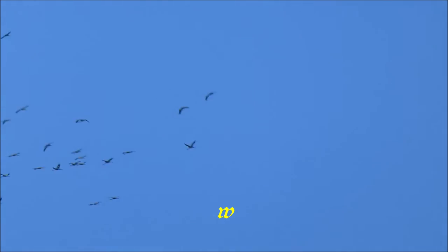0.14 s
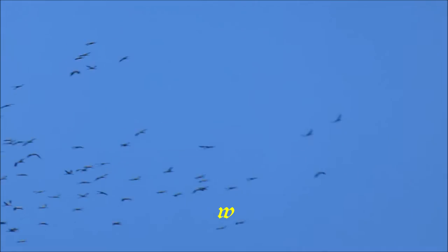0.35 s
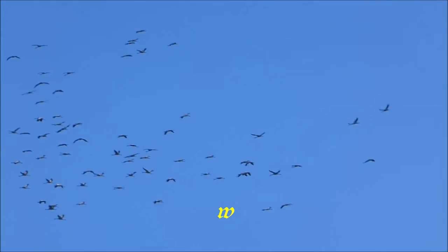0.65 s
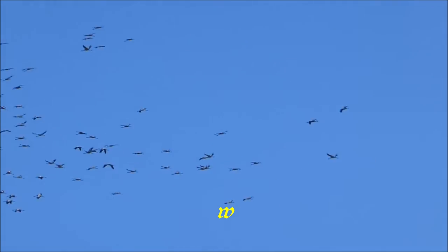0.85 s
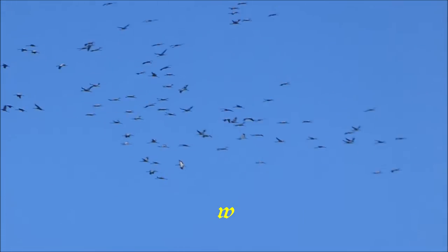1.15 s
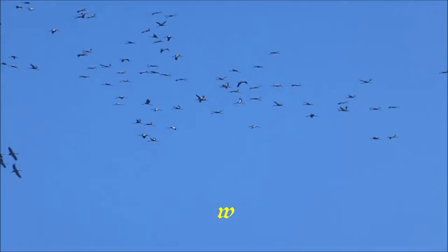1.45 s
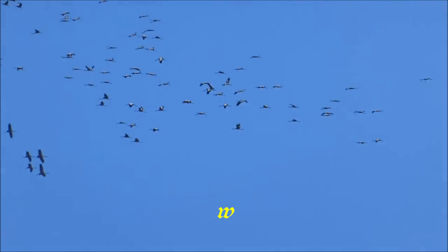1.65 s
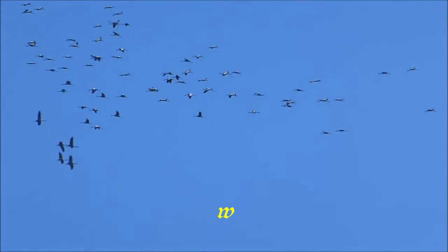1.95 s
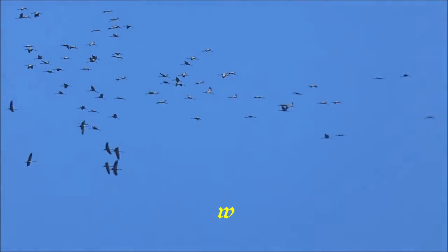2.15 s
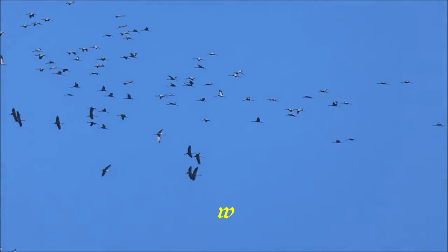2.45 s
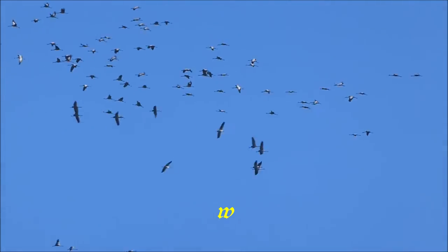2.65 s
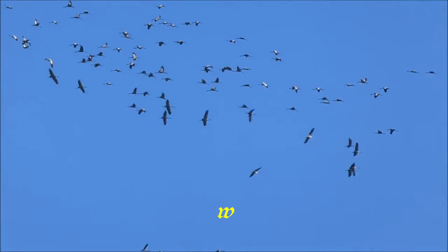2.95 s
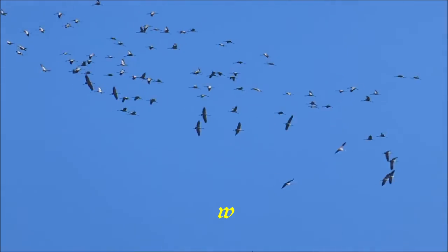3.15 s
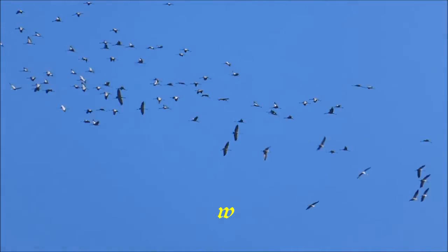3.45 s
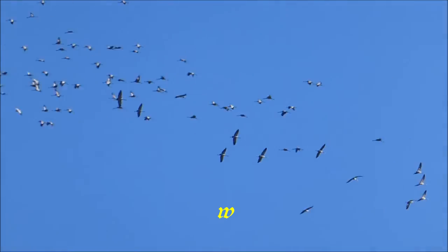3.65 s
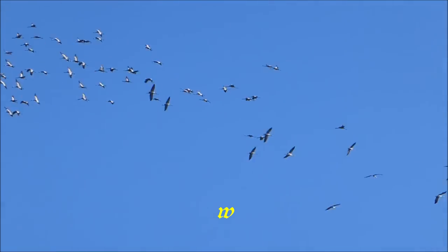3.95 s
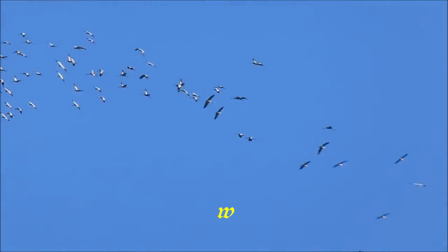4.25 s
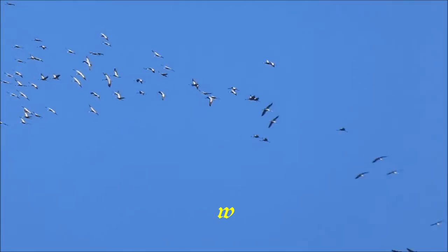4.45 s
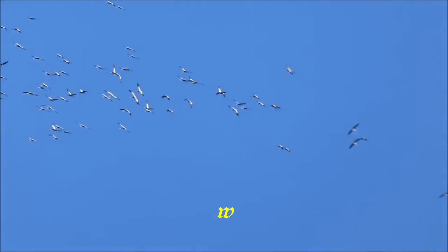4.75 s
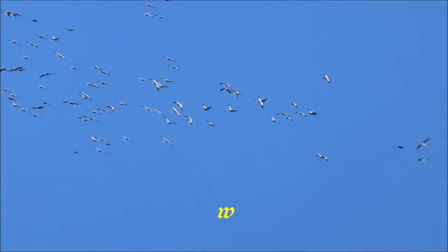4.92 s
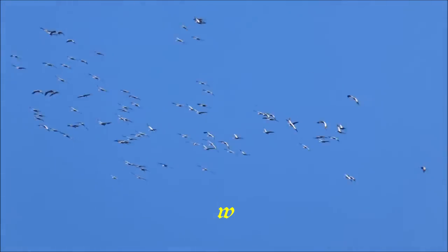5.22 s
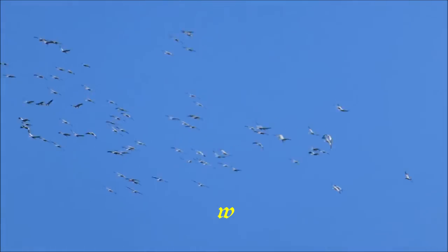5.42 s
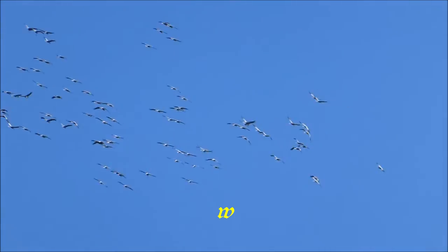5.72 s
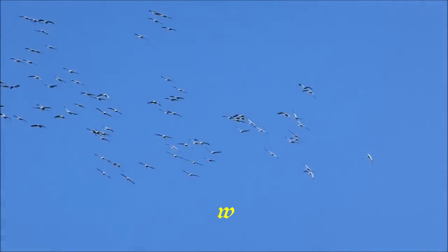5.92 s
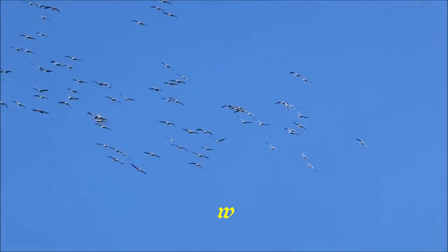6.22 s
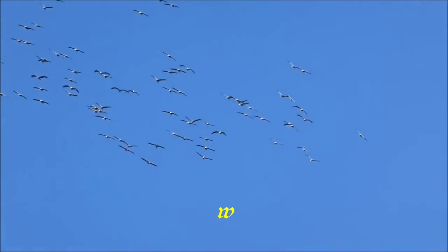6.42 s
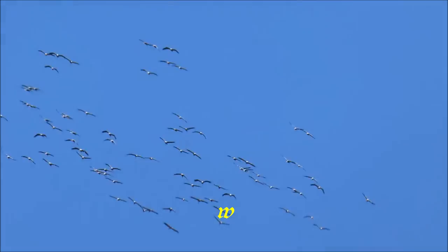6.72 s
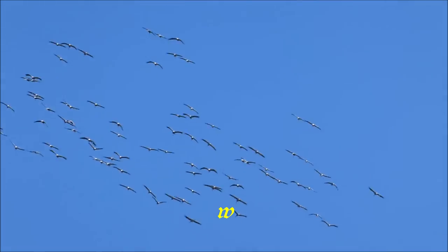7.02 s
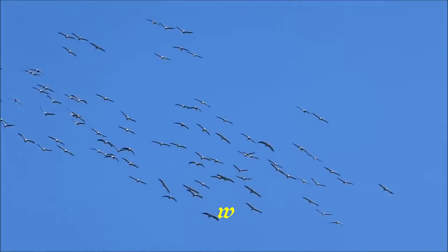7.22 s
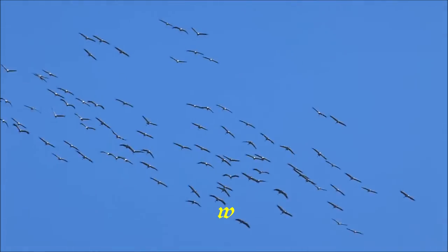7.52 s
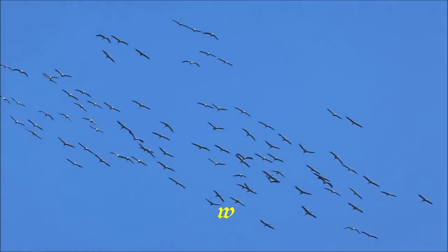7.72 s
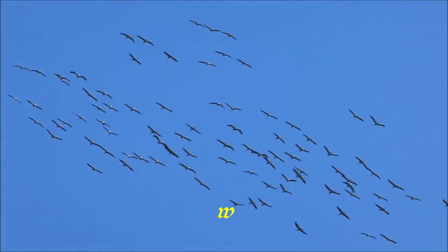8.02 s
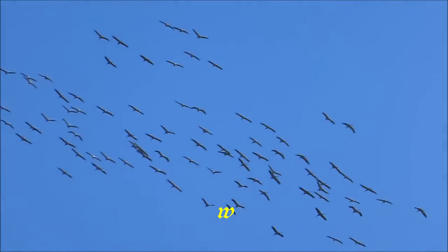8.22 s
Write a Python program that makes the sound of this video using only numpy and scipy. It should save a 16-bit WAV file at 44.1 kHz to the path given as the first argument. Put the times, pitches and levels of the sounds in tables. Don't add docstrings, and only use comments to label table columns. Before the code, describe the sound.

A large flock of cranes bugles overhead in rattling, overlapping calls while small birds chirp and a handheld camera clicks sharply three times early on.

```python
import sys
import numpy as np
from scipy import signal
from scipy.fft import rfft, irfft, next_fast_len
from scipy.io import wavfile
from scipy.ndimage import uniform_filter1d, minimum_filter1d, map_coordinates

SR = 44100
rng = np.random.default_rng(int(sys.argv[2]) if len(sys.argv) > 2 else 0)


def gain_from_db(level_db):
    decades = np.asarray(level_db, float) / 20
    return 10 ** decades


def persist_wave(psi):
    counts = np.round(np.clip(psi, -1, 1) * 32767).astype(np.int16)
    wavfile.write(sys.argv[1], SR, np.atleast_2d(counts).T)


N = 369116

# f/Hz, density level/dB per Hz
SHELL_FRICTION = [(940, -44), (1600, -8), (1960, -0.5), (2150, -10.5), (2820, -11), (3150, -8.5),
                  (3580, -4.5), (4200, -12.5), (4800, -21), (5950, -19), (6610, -31), (7700, -59),
                  (8310, -22.5), (9880, -19), (15800, -33)]


def evened(x):
    return x / np.sqrt(np.mean(x ** 2) + 1e-20)


def add(mix, s, sound):
    part = mix[max(round(s * SR), 0):][:len(sound)]
    part += sound[:len(part)]


def shape(spectrum, hz):
    f, db = np.transpose(spectrum)
    return gain_from_db(np.interp(np.log(hz + 1), np.log(f), db, left=-90, right=-90))


def filtered(x, spectrum):
    size = next_fast_len(x.shape[-1])
    gain = shape(spectrum, np.fft.rfftfreq(size, 1 / SR) + 20)
    return irfft(rfft(x, size) * gain, size)[..., :x.shape[-1]]


def coloured(x, spectrum):
    return evened(filtered(x, spectrum))


def wander(count, rate_hz):
    knots = rng.standard_normal(64)
    return map_coordinates(knots, [np.arange(count) * rate_hz / SR + 1], order=1, mode="wrap")


def scattered(x, t60, dry_db, wet_db):
    t = np.arange(SR // 2) / SR
    build_up = 1 - np.exp(-t / 0.0016)
    tail = rng.standard_normal(len(t)) * gain_from_db(-60 * t / t60) * build_up
    echoes = signal.oaconvolve(x, tail / np.linalg.norm(tail))[:N]
    return gain_from_db(dry_db) * x + gain_from_db(wet_db) * echoes


def crane(length, start_hz, end_hz, db, rattle=0.68, open_db=0):
    partials = [.5, 1, 1.5, 2, 2.5, 3]
    # f/Hz, level/dB
    windpipe = [(350, -50), (550, -16), (700, 10.5), (1250, 4.5), (1450, -8), (1750, -10), (2150, -19),
                (2750, -30.5), (3500, -41.5)]
    halfway_db = -13
    n = round((length + 0.053) * SR)
    hz = np.linspace(start_hz, end_hz, n) * (1 + .007 * wander(n, 40))
    phase = 2 * np.pi * (np.cumsum(hz) / SR + rng.random())
    rattle_hz = rng.uniform(44.35, 84.2) * (1 + 0.322 * wander(n, 25.1))
    beats = np.cumsum(rattle_hz) / SR + rng.random()
    throb = 1 + rattle * np.cos(2 * np.pi * beats)
    voice = np.zeros(n)
    for k in partials:
        lift_db = open_db * max(k - 1, 0) + halfway_db * (k > 1 and k % 1 > 0)
        voice += shape(windpipe, k * hz.mean()) * gain_from_db(lift_db) * np.sin(k * phase)
    unsteady = gain_from_db(2.0 * wander(n, 29.1)) * signal.windows.tukey(n, .8)
    return gain_from_db(db) * evened(voice * throb) * unsteady


def cranes():
    # t/s, length/s, f/Hz, level/dB
    deep = [(.059, 0.22, 803, -47), (.354, 0.14, 869, -52), (.738, 0.044, 857, -49.5),
            (1.27, 0.14, 777, -51), (1.631, 0.19, 815, -50), (1.994, 0.18, 866, -47.5),
            (2.255, .15, 820.5, -43), (3.048, 0.16, 772, -49.5), (3.439, 0.14, 711, -52),
            (3.741, 0.066, 784, -55), (4.454, 0.21, 732, -55.5), (4.922, 0.21, 742, -56),
            (5.159, 0.26, 823, -51), (5.329, 0.213, 839, -50), (6.116, 0.21, 878, -49.5),
            (6.261, 0.23, 805, -45.5), (6.685, 0.11, 806, -59), (6.78, 0.12, 800, -56.5),
            (7.58, 0.16, 890, -49.5), (8.131, 0.19, 884, -56)]
    middle = [(.19, 0.13, 966, -42), (.322, 0.12, 928, -40.5), (.439, 0.17, 889, -46.5),
              (.525, 0.1, 948, -47), (.709, 0.19, 955, -53), (1.043, 0.085, 888, -50),
              (1.427, 0.1, 893, -51), (1.432, 0.064, 980, -42.5), (1.651, 0.11, 933, -42),
              (1.761, 0.11, 892, -47), (1.913, 0.1, 917, -48), (2.0, 0.24, 968, -46),
              (2.478, 0.096, 952, -45), (2.619, 0.16, 984, -47.5), (3.562, 0.16, 994, -53),
              (4.136, 0.18, 959, -50.5), (4.68, 0.21, 935, -46.5), (5.323, 0.079, 940, -47),
              (5.637, 0.37, 946, -53), (6.138, 0.178, 946, -45), (6.269, 0.08, 949, -39),
              (6.37, 0.087, 979, -39), (6.49, 0.42, 975, -50), (7.01, 0.28, 914, -43),
              (7.265, 0.18, 967, -45.5), (7.506, 0.25, 958.5, -42.5), (7.605, 0.38, 942, -51),
              (8.079, 0.097, 965, -43), (8.245, 0.085, 938, -46)]
    high = [(.21, 0.17, 1048, -46.5), (.434, 0.097, 1058, -42.5), (.464, 0.14, 1181, -49),
            (.623, 0.21, 1063, -48.5), (1.227, 0.2, 1051, -40), (1.373, .24, 1075, -50),
            (2.181, 0.17, 1066, -45.5), (2.401, 0.32, 1073, -45.5), (2.712, 0.094, 1065, -43.5),
            (3.006, 0.11, 1147, -44.5), (3.879, 0.21, 1048, -50), (3.987, 0.26, 1030, -43.5),
            (4.355, 0.23, 1030, -50.5), (5.202, 0.14, 1083, -51.5), (5.363, 0.1, 1040, -43),
            (5.465, 0.125, 993, -50), (5.642, 0.2, 1041, -47), (6.196, 0.2, 1088, -41),
            (6.318, 0.1, 1092, -44.5), (6.431, 0.055, 1053, -44.5), (7.366, 0.17, 1106, -41.5),
            (7.618, .22, 1060, -59), (7.888, 0.21, 998, -52.5)]
    # t/s, level/dB
    chorus = [(0.0, -48), (0.47, -39.5), (1.02, -43.5), (1.37, -45), (2.0, -42), (2.65, -47), (2.82, -40),
              (3.5, -48.5), (4.27, -38.5), (4.8, -78), (5.4, -45), (6.2, -38.5), (6.27, -41), (6.65, -38.5),
              (7.1, -37), (7.4, -38.5), (7.76, -38), (8.37, -48.5)]
    near, far = np.zeros(N), np.zeros(N)
    for calls, sag in ((deep, 117), (middle, 188), (high, 229)):
        for s, length, hz, db in calls:
            half_fall = sag * length / 2
            add(near, s - .025, crane(length, hz + half_fall, hz - half_fall, db))
    for s, length, pitch, glide, size in rng.random((400, 5)):
        hz = 640 + 560 * (pitch + glide) / 2
        end_hz = hz * (1.04 - 0.1007 * glide)
        call = crane(0.04 + 0.1214 * length, hz, end_hz, 3 * size, rattle=1.0, open_db=7.8 * glide)
        add(far, s * N / SR - .1, call)
    s, db = np.transpose(chorus)
    far = evened(far) * gain_from_db(np.interp(np.arange(N) / SR, s, db) - 5)
    return scattered(gain_from_db(1.5) * near + far, t60=.35, dry_db=-.5, wet_db=-8)


def soloists():
    # t/s, length/s, start f/Hz, end f/Hz, level/dB
    glides = [(6.94, .21, 765, 870, -48), (7.14, .09, 870, 975, -49), (6.345, 0.092, 1125, 980, -42),
              (6.3, 0.298, 850, 750, -53), (2.97, 0.161, 1200, 1070, -48), (3.13, 0.216, 1200, 1040, -56),
              (6.1, .15, 880, 900, -54), (7.5, .2, 880, 860, -53), (1.75, .2, 1200, 980, -55.5),
              (.02, 0.196, 1020, 1000, -55.5), (4.2, .25, 1000, 990, -55), (3.02, .11, 1055, 1075, -54),
              (3.22, .16, 860, 890, -54), (3.62, .13, 960, 1095, -54), (6.24, .1, 960, 900, -49),
              (3.93, .08, 980, 1010, -54), (5.3, .15, 880, 900, -53), (2.2, .12, 820, 815, -53)]
    # t/s, peak level/dB, f/Hz
    strong_beats = [(0.083, -35.5, 810), (0.299, -44, 943), (0.499, -32, 916), (0.578, -28.5, 863),
                    (0.746, -33, 1060), (0.855, -40.5, 987), (1.235, -29, 1064), (1.366, -27, 1010),
                    (1.465, -34, 916), (1.716, -31, 958), (1.933, -36, 924), (2.12, -30, 900),
                    (2.157, -29, 997), (2.32, -41, 847), (2.522, -28, 953), (2.76, -33, 1076),
                    (2.791, -35, 1032), (4.071, -39.5, 1030), (4.178, -29, 1006), (4.426, -33.5, 1012),
                    (5.218, -38, 1083), (5.255, -32.5, 1058), (6.042, -32.5, 921), (6.218, -29.5, 950),
                    (6.343, -21.5, 918), (6.492, -30.5, 987), (6.547, -29.5, 970), (6.673, -33.5, 955),
                    (6.823, -33, 990), (7.057, -35, 890), (7.102, -34, 845), (7.133, -29.5, 910),
                    (7.531, -34, 866), (7.567, -29.5, 980), (7.613, -22, 958), (7.707, -27, 927),
                    (7.768, -25, 944), (7.884, -30.5, 868)]
    rise_s, hold_s, fade_s, beat_db = 0.00244, 0.0056, 0.01, -3.5
    out, t = np.zeros(N), np.arange(2048) / SR
    for s, length, start_hz, end_hz, db in glides:
        add(out, s - .025, crane(length, start_hz, end_hz, db, rattle=0.69, open_db=6))
    swell = np.minimum(t / rise_s, 1) * np.exp(-np.maximum(t - hold_s, 0) / fade_s)
    for s, db, hz in strong_beats:
        voice = np.sin(2 * np.pi * hz * t) + 0.042 * np.sin(4 * np.pi * hz * t)
        add(out, s - .001, gain_from_db(db + beat_db) * swell * voice)
    return scattered(out, t60=.35, dry_db=-.5, wet_db=-8)


def gulps():
    bursts = [.499, 1.367, 2.523, 4.073, 4.179, 5.217, 5.255, 6.043, 7.134, 7.613, 7.709, 7.885]
    closed_s, depth = .012, .7
    hush = np.zeros(N)
    for s in bursts:
        add(hush, s - closed_s, depth * signal.windows.tukey(round(closed_s * SR), .5))
    return 1 - hush


def note(length, start_hz, end_hz, db, buzz_hz):
    u = np.linspace(0, 1, round(length * SR))
    bend = np.exp(-(buzz_hz / 90) ** 2)
    glide = bend * (1 - (1 - u) ** 2.4) + (1 - bend) * u
    hz = start_hz + (end_hz - start_hz) * glide + buzz_hz * wander(len(u), 359.3)
    loudness = gain_from_db(2.4 * wander(len(u), 64.0) + 2.4 * u)
    whistle = np.sin(2 * np.pi * np.cumsum(hz) / SR) * loudness
    return gain_from_db(db) * whistle * signal.windows.tukey(len(u), .3)


def twitter():
    low_hz, high_hz, base_db, spread_db = 2300, 5200, -78, 3
    out = np.zeros(N)
    for s, length, pitch, glide, size in rng.random((260, 5)):
        hz = low_hz * (high_hz / low_hz) ** pitch
        end_hz = hz * (1.03 - .07 * glide)
        add(out, s * N / SR, note(0.034 + 0.137 * length, hz, end_hz, base_db + spread_db * size, 37))
    return scattered(out, t60=0.17, dry_db=-8.5, wet_db=-3.0)


def hum():
    # t/s, level/dB
    engine = [(0.0, -66), (0.25, -91), (2.38, -74), (2.49, -80), (4.85, -75.5), (5.08, -80.5), (7.37, -76),
              (8.37, -76)]
    turns = np.cumsum(106 + 3.13 * wander(N, 9.1)) / SR
    level_db = np.interp(np.arange(N) / SR, *np.transpose(engine)) + 3.9 * wander(N, 5.2)
    return gain_from_db(level_db) * np.sin(2 * np.pi * turns)


def air(spectrum, db, patchy_db):
    hz, t, z = signal.stft(coloured(rng.standard_normal(N), spectrum), SR, nperseg=1024)
    grain = rng.standard_normal(z.shape)
    patches = evened(uniform_filter1d(uniform_filter1d(grain, 9, 0), 10, 1))
    drift_db = patchy_db * patches / (1 + (hz[:, None] / 4000) ** 2)
    return gain_from_db(db) * signal.istft(z * gain_from_db(drift_db), SR, nperseg=1024)[1][:N]


def plane():
    # t/s, level/dB
    fading = [(0.0, -57), (0.07, -61.5), (3.08, -60.5), (3.15, -53), (3.28, -65), (4.48, -62),
              (8.28, -78.5), (8.37, -70)]
    # f/Hz, density level/dB per Hz
    roar = [(65, -67), (110, -30), (189, -15.5), (237, -23), (307, -16), (425, -5), (520, -3.5), (680, -16),
            (1140, -120)]
    s, db = np.transpose(fading)
    return gain_from_db(np.interp(np.arange(N) / SR, s, db)) * air(roar, 0.78, patchy_db=3.0)


def lens_drive():
    # f/Hz, density level/dB per Hz
    gears = [(5000, -41), (8500, -15), (9020, -1), (9500, 5), (10900, 5), (11800, -2), (12700, 5),
             (15800, -18)]
    whirr_db, end_s = -62, 0.388
    t = np.arange(N) / SR
    steps = 2 * np.pi * 109 * t
    step_gain = gain_from_db(whirr_db + 3.6 * np.cos(steps) + 3.4 * np.cos(2 * steps))
    whirr = step_gain * np.clip((end_s - t) / .02, 0, 1)
    return whirr * coloured(rng.standard_normal((2, N)), gears) * [[1], [.3]]


def songbirds():
    # t/s, length/s, level/dB
    climbs = [
        (0.342, 0.31, -66.5),
        (3.76, .28, -76),
        (4.78, 0.11, -71),
        (6.39, 0.28, -69.5),
    ]
    # t/s, length/s, start f/Hz, end f/Hz, level/dB
    sweeps = [(0.564, 0.042, 9000, 7800, -54.5), (0.569, 0.11, 7000, 6180, -55),
              (1.808, 0.04, 8200, 6700, -44), (1.883, 0.06, 8300, 8770, -51),
              (1.95, 0.053, 7580, 7230, -43.5), (2.015, 0.043, 4980, 5240, -47),
              (2.024, 0.021, 5010, 4130, -45.5), (2.029, 0.045, 4070, 3830, -43),
              (2.249, 0.06, 4320, 3220, -52), (2.579, 0.062, 7480, 8200, -53),
              (2.644, 0.016, 6180, 5780, -49), (2.725, 0.032, 7480, 7420, -45.5),
              (2.734, 0.052, 5930, 6250, -50.5), (4.866, 0.046, 9550, 6870, -52),
              (4.866, 0.08, 7270, 5800, -54), (4.89, 0.03, 6230, 4770, -61), (5.289, 0.18, 5560, 5400, -64),
              (5.503, 0.14, 6360, 5550, -60.5), (5.886, 0.15, 5320, 4800, -59),
              (6.573, .25, 3700, 3530, -66), (8.067, 0.064, 8030, 6200, -70)]
    # t/s, length/s, f/Hz, level/dB
    pipes = [(0.758, 0.12, 4070, -64), (0.773, 0.068, 3540, -57.5), (0.845, 0.042, 4400, -60),
             (0.923, 0.04, 3240, -52), (1.037, 0.17, 4450, -66), (1.158, 0.047, 3820, -59),
             (1.303, 0.077, 4350, -57), (1.535, 0.032, 8000, -64), (1.62, 0.09, 6660, -63),
             (1.733, 0.057, 8420, -45), (1.787, 0.49, 6250, -71.5), (2.302, 0.051, 2750, -62),
             (2.156, 0.054, 4250, -50), (2.2, 0.06, 3890, -51.5), (2.387, 0.047, 2720, -48.5),
             (2.626, 0.04, 7600, -49), (2.636, 0.042, 5545, -44.5), (2.695, 0.036, 8230, -50.5),
             (4.144, 0.06, 4150, -58), (4.298, 0.037, 4615, -54.5), (5.688, 0.13, 4286, -49.5),
             (6.069, 0.12, 4240, -50.5), (6.252, 0.22, 4220, -71), (1.38, 0.078, 4430, -78),
             (8.192, 0.015, 6000, -60)]
    lift = 0.0074
    out = np.zeros(N)
    for s, length, db in climbs:
        add(out, s - .008, note(length, 7330, 8190, db, buzz_hz=8.6))
    for s, length, start_hz, end_hz, db in sweeps:
        buzz_hz = 166 + 0.115 * abs(end_hz - start_hz)
        add(out, s - .008, note(length, start_hz, end_hz, db, buzz_hz))
    for s, length, hz, db in pipes:
        waver_hz = 3.16 / length
        add(out, s - .008, note(length, hz * (1 - lift), hz * (1 + lift / 2), db, waver_hz))
    return scattered(out, t60=.48, dry_db=-2.5, wet_db=-1.5)


def rubs():
    # t/s, length/s, level/dB
    slides = [(0.914, 0.052, -49), (0.958, 0.016, -47), (1.57, 0.095, -50.5), (1.675, 0.06, -51),
              (2.771, 0.074, -51.5), (2.827, 0.039, -41), (2.936, 0.28, -60.5), (7.086, 0.059, -61.5),
              (7.16, 0.105, -47), (7.23, 0.09, -54), (7.29, 0.12, -56)]
    pressure = np.zeros(N)
    for s, length, db in slides:
        add(pressure, s, gain_from_db(db) * signal.windows.tukey(round(length * SR), .8))
    noise = rng.standard_normal(N)
    grip = evened(uniform_filter1d(noise[::-1], size=150))
    return pressure * gain_from_db(1.4 * grip) * coloured(noise, SHELL_FRICTION)


def creaks():
    # t/s, peak level/dB
    ticks = [
        (0.916, -41),
        (1.98, -42),
        (2.3223, -43.5),
        (2.787, -41),
        (2.9464, -40),
        (3.2735, -46),
        (7.1846, -42),
        (7.2094, -44),
        (7.2283, -41),
    ]
    # t/s, length/s, start f/Hz, end f/Hz, level/dB
    squeaks = [
        (1.6, .045, 3500, 3400, -58),
        (1.645, .085, 3380, 3450, -59),
        (1.69, .035, 4150, 4120, -57),
        (.942, .014, 3150, 3250, -42),
        (.914, .016, 3250, 3250, -50),
    ]
    out, t = np.zeros(N), np.arange(1024) / SR
    for s, db in ticks:
        tick = np.exp(-t / 0.0018) * coloured(rng.standard_normal(len(t)), SHELL_FRICTION)
        add(out, s, gain_from_db(db - 3) * tick)
    for s, length, start_hz, end_hz, db in squeaks:
        add(out, s, note(length, start_hz, end_hz, db, 60))
    return out


def clicks():
    # t/s, level/dB, build-up/s, decay/s, snap level/dB
    strokes = [
        (0.9559, -12.5, 0.0034, 0.0012, -19),
        (1.732, -18, 0.00021, 0.0026, -40),
        (2.8382, -21.5, 0.0035, 0.0015, -19),
    ]
    # f/Hz, density level/dB per Hz
    first_body = [(530, -60), (900, -33), (1040, -75), (1890, -3), (2740, -12.5), (3130, 0), (3700, -6.5),
                  (4760, -20), (5840, -13), (7880, -30), (9550, -23), (15800, -36)]
    second_body = [(530, -45), (900, -15), (1400, -45), (1920, -9.5), (2910, -11), (3530, 0), (4130, -9),
                   (4540, -27), (15800, -46)]
    third_body = [(530, -46), (900, -2.5), (1420, -15), (1870, 0), (2910, -6), (4030, 2.5), (4490, -20),
                  (5840, 1), (6510, -14), (9780, -16), (11800, -21), (14000, -25), (15800, -27)]
    # f/Hz, density level/dB per Hz
    snap_treble = [(5000, -35), (8000, -18), (9800, -1), (11200, -10), (13000, -11), (15000, -10),
                   (16400, -16)]
    # t/s, f/Hz, peak level/dB, t60/s
    rings = [
        (.9563, 2120, -16, 0.011),
        (.9523, 3200, -23, 0.026),
        (2.8382, 4000, -33, 0.012),
        (2.8455, 4000, -37, 0.06),
    ]
    # f/Hz, level/dB
    ring_high_pass = [(20, -70), (400, -40), (1500, 0), (20000, 0)]
    out, t = np.zeros((2, N)), np.arange(-2048, 2048) / SR
    for (s, db, rise, fall, snap_db), body in zip(strokes, (first_body, second_body, third_body)):
        envelope = np.exp(np.where(t < 0, t / rise, -t / fall))
        scrape = gain_from_db(db) * envelope * coloured(rng.standard_normal(len(t)), body)
        burst = coloured(rng.standard_normal((2, len(t))), snap_treble)
        snap = gain_from_db(snap_db) * np.exp(-abs(t) / 0.00068) * burst
        add(out[0], s + t[0], scrape + snap[0])
        add(out[1], s + t[0], 0.25 * np.diff(snap[1] + .2 * snap[0], n=2))
    for s, hz, db, t60 in rings:
        ring = (t > 0) * gain_from_db(db - 60 * abs(t) / t60) * np.sin(2 * np.pi * hz * t)
        add(out[0], s + t[0], filtered(ring, ring_high_pass))
    return out


def graces():
    # t/s, length/s, start f/Hz, end f/Hz, level/dB
    slurs = [(6.033, .05, 4130, 4250, -54), (2.108, .022, 4250, 4330, -50), (2.128, .036, 4340, 4280, -39),
             (2.145, .075, 3990, 3960, -45), (2.19, .04, 5300, 4500, -59), (2.035, .04, 3520, 3560, -53),
             (2.352, .025, 2760, 2780, -55), (2.315, .02, 3350, 3300, -57), (6.375, .025, 4600, 3000, -63),
             (6.48, .025, 4200, 3000, -61), (7.425, .04, 4300, 4600, -65), (1.915, .03, 4100, 4100, -65)]
    out = np.zeros(N)
    for s, length, start_hz, end_hz, db in slurs:
        add(out, s - .008, note(length, start_hz, end_hz, db, 41))
    return scattered(out, t60=.4, dry_db=-3, wet_db=-1)


def scene():
    # f/Hz, density level/dB per Hz
    common_air = [(15, -85), (25, -88), (99, -30.5), (253, -33.5), (332, -50), (390, -22), (668, -13),
                  (948, -3.5), (1380, -18), (1960, -20.5), (2430, -27), (5000, -33.5), (6080, -33.5),
                  (7540, -41), (9870, -33.5), (15600, -42.5)]
    # f/Hz, density level/dB per Hz
    port_noise = [(15, -53), (25, -27), (96, -9), (255, -7), (657, 2.5), (933, -48), (1260, -1),
                  (7260, -14.5), (9780, -7), (12500, -7.5), (15900, -13)]
    mid, side = lens_drive() + clicks()
    mid = mid + gulps() * cranes() + soloists()
    mid = mid + twitter() + songbirds() + graces()
    mid = mid + hum() + plane() + air(common_air, -48.5, patchy_db=1.6)
    mid = mid + rubs() + creaks()
    side = side + air(port_noise, -71, patchy_db=-2.0)
    side = side + gain_from_db(-15.0) * np.gradient(mid)
    return np.array([mid + side, mid - side])


def starved(x, under_db):
    side_top_hz, side_kept, side_bass_kept = 8300, .45, .85
    hz, t, z = signal.stft(x, SR, nperseg=1024)
    power = uniform_filter1d(uniform_filter1d(abs(z[0] + z[1]) ** 2, 5, 0), 6, 1)
    band_db = 10 * np.log10(power + 1e-20)
    nearby_db = -minimum_filter1d(-band_db, size=40, axis=0)
    treble = (hz > 6500) & (hz < 9000)
    faint = band_db < np.percentile(band_db[treble], 5)
    empty = (faint | (band_db < nearby_db - under_db)) & treble[:, None]
    in_time = uniform_filter1d(rng.standard_normal(len(t)), size=5)
    in_bands = np.repeat(rng.standard_normal((65, len(t))), 8, 0)[:len(hz)]
    spare = in_time + .45 * in_bands
    kept = np.where(hz < 700, side_bass_kept, side_kept)[:, None]
    dropped = (spare < np.quantile(spare, 1 - kept)) & (hz < side_top_hz)[:, None]
    mid, side = (z[0] + z[1]) / 2, (z[0] - z[1]) / 2 * ~dropped
    thinned = np.array([mid + side, mid - side]) * np.where(empty, .12, 1)
    return signal.istft(thinned, SR, nperseg=1024)[1][:, :N]


def low_pass(x):
    return signal.sosfilt(signal.butter(12, 16490, fs=SR, output="sos"), x)


def record(dry):
    # t/s, depth/dB, recovery/s
    ducks = [
        (0.969, -7, 0.04),
        (1.75, -2, 0.06),
        (2.868, -11, 0.075),
    ]
    # f/Hz, level/dB
    band_limit = [(20, 0), (15680, 0), (15780, -22), (16400, -25), (16600, -80)]
    hold_s, slow_s, slow_share, treble_share = .03, .45, .3, .35
    t, gain_db = np.arange(N) / SR, np.zeros(N)
    for s, depth_db, back in ducks:
        since = np.maximum(t - s - hold_s, 0)
        recovery = (1 - slow_share) * np.exp(-since / back) + slow_share * np.exp(-since / slow_s)
        gain_db += depth_db * np.clip((t - s) / 0.025 + 1, 0, 1) * recovery
    dry = starved(filtered(dry, band_limit), under_db=23.0)
    low = uniform_filter1d(uniform_filter1d(dry, size=5, axis=1), size=5, axis=1)
    treble = (dry - low) * gain_from_db(treble_share * gain_db)
    ducked = (low + treble) * gain_from_db(gain_db)
    return low_pass(ducked)


dry = scene()
out = record(dry)
persist_wave(out)
```